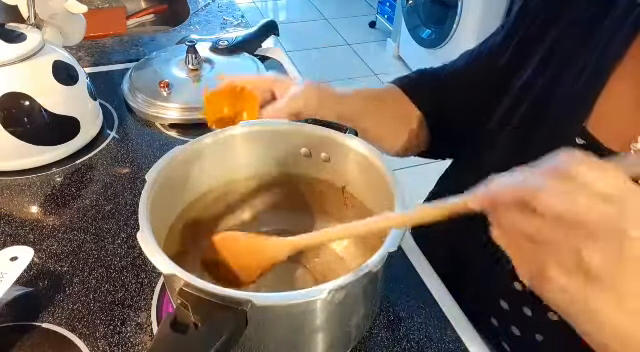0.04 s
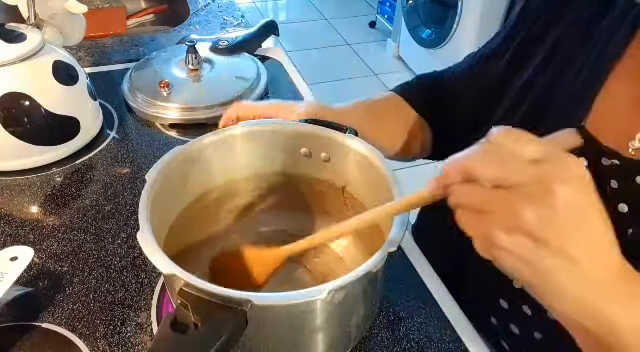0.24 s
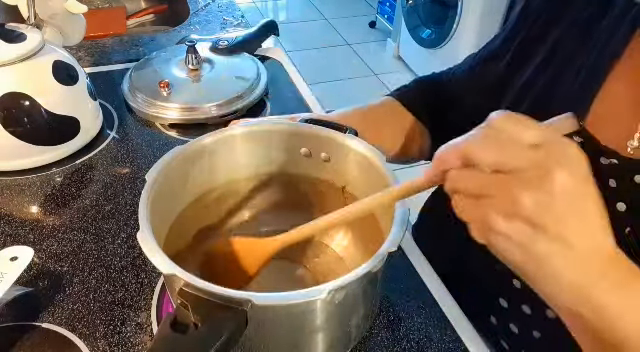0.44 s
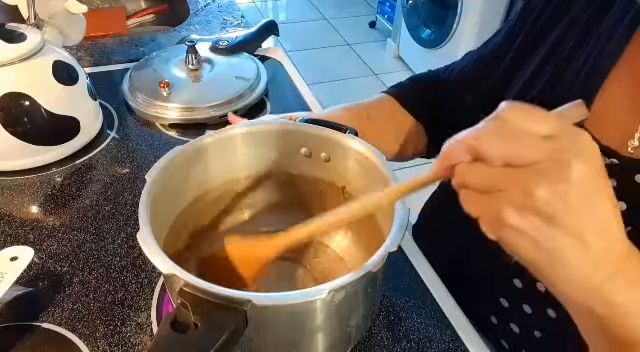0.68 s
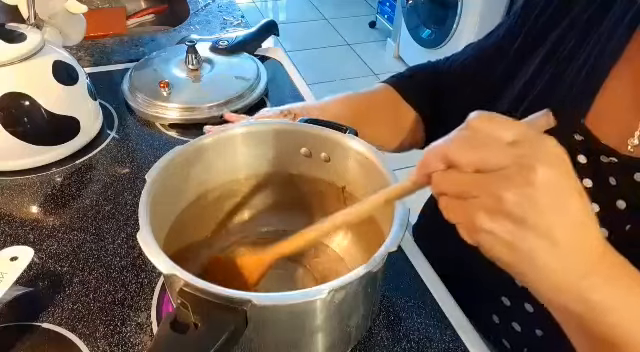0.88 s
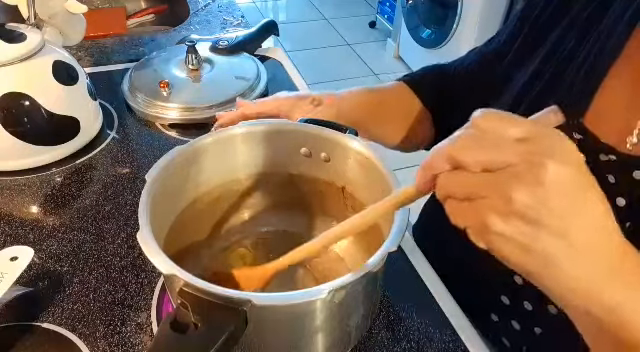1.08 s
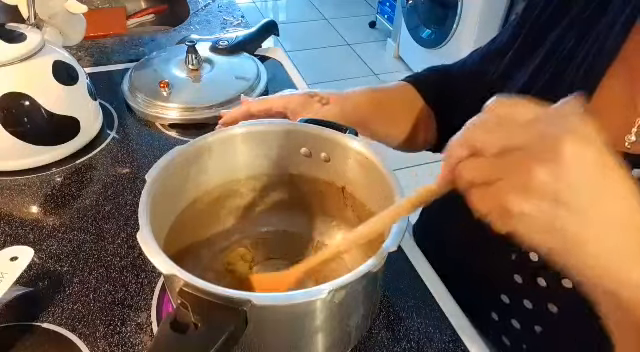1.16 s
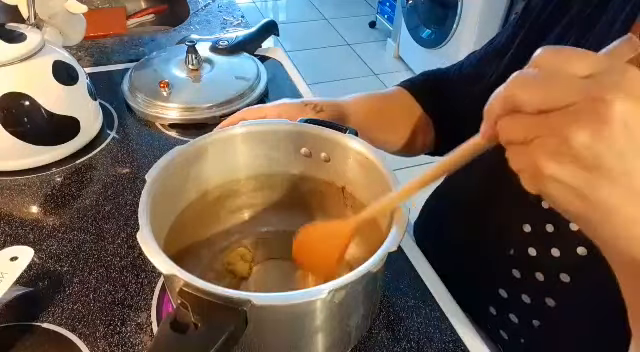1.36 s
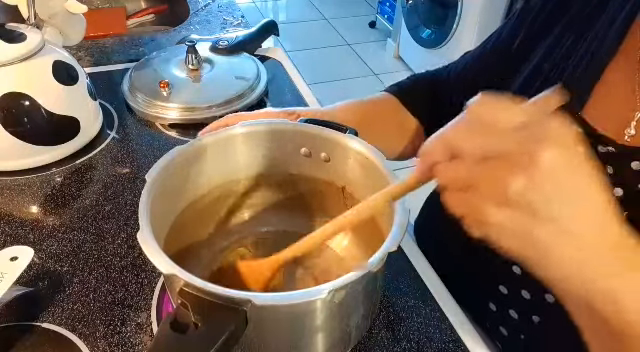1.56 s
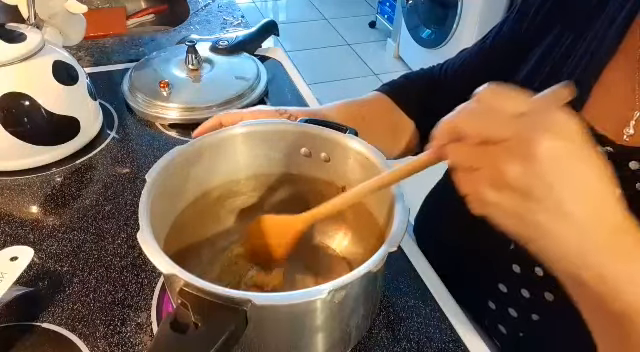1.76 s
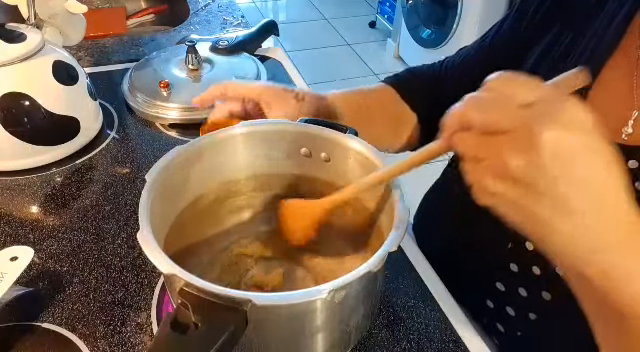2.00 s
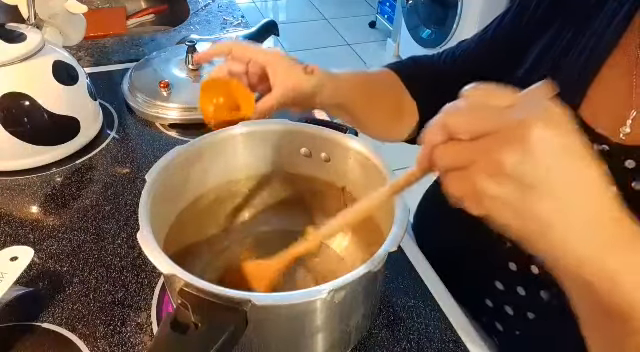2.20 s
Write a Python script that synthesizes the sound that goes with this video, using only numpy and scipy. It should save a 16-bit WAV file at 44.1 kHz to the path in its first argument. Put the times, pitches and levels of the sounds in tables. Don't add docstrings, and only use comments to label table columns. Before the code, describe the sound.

A wooden spoon scrapes and knocks a metal soup pot close to a phone; early on a small jar clacks down on the counter, then rougher strokes and low booms follow over a soft fridge hum.

```python
import sys
import numpy as np
from scipy import signal
from scipy.fft import rfft, irfft, next_fast_len
from scipy.io import wavfile
from scipy.ndimage import map_coordinates

SR = 44100
rng = np.random.default_rng(int(sys.argv[2]) if len(sys.argv) > 2 else 0)


def decibels_to_gain(level_db):
    exponent = np.asarray(level_db, float) / 20
    return 10 ** exponent


def inscribe(sig):
    pcm = np.round(np.clip(np.atleast_2d(sig).T, -1, 1) * 32767)
    wavfile.write(sys.argv[1], SR, pcm.astype(np.int16))


N = 98607

ORDERS_DB = {2: -55, 7: -65, 9: -73, 10: -77, 11: -70, 35: -85, 37: -90, 38: -82, 39: -73, 40: -89}
SHAFT_HZ = 58.66
DRONE_HZ, DRONE_DB, DRONE_WANDER_RAD = 74.2, -49, 1.2
FLUTTER_DB, FLUTTER_PER_S, FLUTTER_RAD = 1.3, 45, 0.3
# [f/Hz, lead/rad]
FRIDGE_TURN = [(100, .6), (600, .6), (2300, 1.4)]
# [f/Hz, level/dB per Hz]
RUMBLE = [(12, -109), (20, -40.5), (54, 4.5), (112, 3), (211, -9.5), (412, -10), (461, -18), (644, -32.5),
          (900, -37.5), (1170, -82), (1980, -120)]
# [f/Hz, level/dB per Hz]
HISS = [(600, 6.5), (900, -13), (1600, -9), (2250, -10), (2900, -15.5), (7000, -22), (12500, -17),
        (16000, -29)]
RUMBLE_DB, HISS_DB = -52.5, -74.5

# [f/Hz, level/dB, t60/s]
BOTTOM = [(148.6, -1, 0.12), (170.9, -2, 0.12), (254, -8.5, 0.083)]
BELLY = [(384, 0.5, 0.12), (485.3, 3.5, 0.089), (521, -16.5, 0.29), (710, -39, 0.024)]
WALL = [(1128, 0, .08), (1165, -8, .035), (845, -14, .07), (1740, -13, .05)]
RIM = [(1065, 0, .06), (1010, -5, .2), (2022, -12, .22), (1770, -4, .04), (715, -9, .1), (3700, -14, .025)]
# [t/s, rasp level/dB, grip on the pot over the rasp/dB]
STROKES = [
    [(0.326, -81, -15), (0.337, -64, 0), (0.345, -58, 6), (0.373, -56, 7.5), (0.463, -81, -16),
     (0.49, -84, -15)],
    [(0.87, -86, 20), (0.89, -66.5, -4), (0.912, -56.5, 19), (0.978, -51.5, 6), (1.024, -71, -3),
     (1.06, -85, -2)],
    [(1.1, -82, -11), (1.232, -82, -14.5), (1.296, -71.5, -3), (1.304, -58, -34), (1.348, -51.5, -2),
     (1.37, -65.5, 6), (1.392, -53.5, 5.5), (1.52, -78, 4)],
    [(1.699, -65, 11), (1.708, -55.5, 0), (1.738, -60.5, 11), (1.808, -43, 5.5), (1.844, -47, 7.5),
     (1.854, -50, 5), (1.882, -90, 2)],
    [(1.884, -59.5, 17.5), (1.892, -43, 3), (1.92, -78, -5), (1.956, -86, 2), (2.024, -59, 2),
     (2.038, -59.5, 13.5)],
    [(2.041, -69, -8), (2.047, -51, 12.5), (2.059, -61, 22), (2.081, -66.5, 21), (2.091, -48, -15),
     (2.103, -56.5, 11), (2.207, -61, -1.5), (2.236, -71, 14)],
]
# [f/Hz, level/dB per Hz]
RASP = [(500, -49), (1500, -15.5), (3000, -17), (4400, -13.5), (8000, -16.5), (12000, -18.5),
        (14500, -20.5), (15800, -35)]
# [f/Hz, level/dB per Hz]
GRIT = [(300, -20), (600, 5.5), (1200, 2.5), (2300, 1), (4500, -13), (8000, -27)]
GRIP_DB = [0.5, -11.5, -15, -8]
GRAINS_PER_S, GRIT_PER_S, GRAIN_SWAY_DB = 16000, 4000, 1.42

# [t/s, bottom level/dB, belly level/dB, wall level/dB, slap level/dB]
KNOCKS = [(0.343, -28.5, -43, -49.5, -53), (0.393, -37.5, -55, -77, -52),
          (0.9132, -24.5, -28.5, -29, -24.5), (0.963, -53, -42, -69, -67), (1.398, -42, -57, -60, -38),
          (1.404, -32.5, -48.5, -31, -59), (1.421, -45, -61, -38.5, -64), (1.441, -36, -63, -51, -68),
          (1.702, -27, -35.5, -62, -50), (1.734, -67, -50, -65, -69), (1.804, -59, -70, -39.5, -65),
          (1.8861, -70, -63, -53, -38), (2.0435, -31.5, -37.5, -77, -31), (2.063, -69, -37, -73, -46),
          (2.072, -47, -36.5, -69, -42), (2.089, -45, -55, -72, -40), (2.0932, -32.5, -53, -60, -54)]
# [t/s, level/dB]
RIM_TAPS = [
    (2.0435, -30.5),
]
# [t/s, level/dB, f/Hz, t60/s]
BOOMS = [
    (.96, -37, 172, .14),
    (1.733, -38, 175, .15),
    (2.0648, -31, 135, .04),
    (2.0735, -32, 177, .3),
    (2.0848, -42, 177, .12),
    (2.0957, -22, 168, .07),
    (2.1318, -36, 160, .12),
]
# [f/Hz, level/dB per Hz]
SLAP = [(150, -14), (500, 0), (1200, -1.5), (2400, -12), (3500, -35), (7000, -32), (15000, -39)]
SWELL_S, BOOM_SWELL_S, SLAP_T60_S = 0.0025, 0.001, 0.03
LEFT_LEADS_S, RIM_LEADS_S = 0.00013, 0.0001
TURN_RAD, SCATTER_DB = 0.3, 1.5

# [t/s, level/dB, f/Hz, t60/s]
PUSHES = [
    (0.606, -24, 125, 0.047),
    (.795, -39, 890, 0.048),
]
# [t/s, level/dB]
JAR_DROPS = [
    (.6166, -9),
    (.6215, -27),
    (.6268, -16),
    (.632, -24),
    (.637, -25),
    (.665, -28),
    (.805, -46),
]
# [f/Hz, level/dB, t60/s]
JAR_SNAP = [(2220, 4, .013), (2390, 1, .011), (1760, -14, .05), (2040, -15, .09), (330, -13, .035),
            (695, -17, .06)]
# [f/Hz, level/dB per Hz]
CLACK = [(120, -32), (300, -1.5), (560, 3.5), (1100, -2), (2200, 5.5), (4600, -6.5), (5600, -20),
         (15000, -39)]
# [f/Hz, level/dB per Hz]
TICK = [(2000, -56), (5000, -2), (9000, -9), (15000, -11)]
CLACK_DB, CLACK_T60_S = -8.5, 0.014
TICK_DB, TICK_T60_S, TICK_GROWS = -21, 0.03, 1.6
JAR_LEADS_S, JAR_SWELL_S = -0.00005, 0.0012

# [f/Hz, t60/s]
KITCHEN = [(150, 0.73), (1000, 0.47), (3000, 0.42), (6000, 0.38), (14000, 0.51)]
POT_WET_DB, RASP_WET_DB, JAR_WET_DB, SNAP_WET_DB = -11, -13, -1.5, -11
# [f/Hz, likeness 0..1]
ALIKE = [(60, 1), (300, 0.81), (600, 0.2), (1400, 0.036), (4000, 0.05)]
# [f/Hz, level/dB]
LEAN = [(40, 7), (150, 7), (400, 2.5), (2000, 3), (12000, 3)]
LOW_HZ, TOP_HZ, EDGE_HZ = 45, 15700, 50


def unit(x):
    return x / np.sqrt(np.mean(x ** 2) + 1e-20)


def along(points, hz):
    f, v = np.transpose(points)
    return np.interp(np.log(hz + 1), np.log(f + 1), v)


def wobble(rate):
    return map_coordinates(rng.standard_normal(200), [np.arange(N) * rate / SR])


def filtered(x, response):
    m = next_fast_len(N + SR // 2)
    return irfft(rfft(x, m) * response(np.fft.rfftfreq(m, 1 / SR)), m)[..., :N]


def spread(pair):
    def mid_side(hz):
        turn = np.arccos(np.clip(along(ALIKE, hz), 0, 1)) / 2
        return np.array([np.cos(turn), np.sin(turn)])

    mid, side = filtered(pair, mid_side)
    return np.array([mid + side, mid - side])


def add(into, s, sound):
    into[:, round(s * SR):][:, :sound.shape[1]] += sound


def fridge_tone(hz, db, wander_rad, sway_db, sway_per_s=9.8):
    t = np.arange(N) / SR
    level = decibels_to_gain(db + 3.0 + sway_db * wobble(sway_per_s))
    apart = along(FRIDGE_TURN, hz) * np.array([[-.5], [.5]])
    return level * np.sin(2 * np.pi * hz * t + wander_rad * wobble(5) + apart)


def fridge_bed(colour):
    noise = rng.standard_normal((2, N))
    return spread(unit(filtered(noise, lambda hz: decibels_to_gain(along(colour, hz)))))


def fridge():
    out = fridge_tone(DRONE_HZ, DRONE_DB, DRONE_WANDER_RAD, 0.67)
    for k, db in ORDERS_DB.items():
        sway = (0.1, 1) if k < 20 else (FLUTTER_RAD, FLUTTER_DB, FLUTTER_PER_S)
        out = out + fridge_tone(k * SHAFT_HZ, db, *sway)
    rumble = decibels_to_gain(RUMBLE_DB) * fridge_bed(RUMBLE + [(1500, -95)])
    hiss = decibels_to_gain(HISS_DB) * fridge_bed([(300, -99)] + HISS)
    return out + rumble + hiss


def slips(rate):
    pulses = (rng.random((2, N)) < rate / SR) * rng.standard_normal((2, N))
    return unit(pulses) * decibels_to_gain(GRAIN_SWAY_DB * wobble(65))


def pot_response(hz):
    out = decibels_to_gain(along(GRIT, hz))
    for grip_db, part in zip(GRIP_DB, (BOTTOM, BELLY, WALL, RIM)):
        for centre, db, t60 in part:
            damping = 1j * hz * 2.2 / t60
            out = out + decibels_to_gain(grip_db + db + 17.5) * damping / (centre * centre - hz * hz + damping)
    return out


def scrape():
    t = np.arange(N) / SR
    rasp, grip = np.zeros(N), np.zeros(N)
    for rows in STROKES:
        s, db, grip_db = np.transpose(rows)
        rasp += decibels_to_gain(np.interp(t, s, db, -120, -120))
        grip += decibels_to_gain(np.interp(t, s, db + grip_db, -120, -120))
    treble = np.mean(decibels_to_gain(2 * along(RASP, np.linspace(5000, 15000, 99))))
    top = np.sqrt(treble * 10000 / (SR / 2))
    fine = filtered(rasp * slips(GRAINS_PER_S), lambda hz: decibels_to_gain(along(RASP, hz)) / top)
    coarse = filtered(grip * slips(GRIT_PER_S), pot_response)
    return spread(fine + coarse)


def kitchen(x):
    hz, t, z = signal.stft(rng.standard_normal((2, SR)), SR, nperseg=256)
    decay = decibels_to_gain(-60 * t / along(KITCHEN, hz)[:, None])
    tail = signal.istft(z * decay, SR, nperseg=256)[1]
    tail = spread(np.pad(tail, ((0, 0), (200, N)))[:, :N])
    send = x.mean(0)[None] + x[:1] - x[1:]
    return signal.fftconvolve(send, tail / np.linalg.norm(tail[0]), axes=1)[:, :N]


def ring(modes, t, swell_s, lead_s=LEFT_LEADS_S):
    hz, db, t60 = np.transpose(modes)[..., None, None]
    luck = rng.standard_normal((len(modes), 2))
    lead = 2 * np.pi * hz * lead_s + TURN_RAD * luck[:, :1, None]
    apart = lead * np.array([[.5], [-.5]])
    level = decibels_to_gain(db + SCATTER_DB * luck[:, 1:, None] - 60 * t / t60)
    tones = level * np.sin(2 * np.pi * hz * t + apart)
    return tones.sum(0) * (1 - np.exp(-t / swell_s))


def crack(t, t60, colour):
    n = len(t)
    m = 2 * n
    hz = np.fft.rfftfreq(m, 1 / SR)
    cepstrum = irfft(np.log(decibels_to_gain(along(colour, hz))), m)
    cepstrum = cepstrum * np.r_[1, np.full(n - 1, 2), np.zeros(n)]
    a, b = rng.standard_normal((2, n)) * decibels_to_gain(-60 * t / t60)
    share = np.clip(along(ALIKE, hz), 0, 1)
    mid = rfft(a, m) * np.sqrt(1 + share)
    side = rfft(b, m) * np.sqrt(1 - share)
    pair = mid + side * np.array([[1], [-1]])
    return 2 * irfft(pair * np.exp(rfft(cepstrum)), m)[:, :n]


def knocks():
    out, t = np.zeros((2, N + SR)), np.arange(SR // 3) / SR
    for s, *dbs, slap_db in KNOCKS:
        for db, part in zip(dbs, (BOTTOM, BELLY, WALL)):
            add(out, s, decibels_to_gain(db) * ring(part, t, SWELL_S))
        add(out, s, decibels_to_gain(slap_db + 4.5) * crack(t, SLAP_T60_S, SLAP))
    for s, db in RIM_TAPS:
        add(out, s, decibels_to_gain(db) * ring(RIM, t, SWELL_S, RIM_LEADS_S))
    for s, db, hz, t60 in BOOMS:
        add(out, s, decibels_to_gain(db) * ring([(hz, 0, t60)], t, BOOM_SWELL_S))
    return out[:, :N]


def jar():
    snap, clack = np.zeros((2, 2, N + SR))
    t = np.arange(SR // 3) / SR
    for s, db, hz, t60 in PUSHES:
        add(snap, s, decibels_to_gain(db) * ring([(hz, 0, t60)], t, 0.0029))
    hardest_db = JAR_DROPS[0][1]
    for s, db in JAR_DROPS:
        tick_db = TICK_DB + (TICK_GROWS - 1) * (db - hardest_db)
        tick = decibels_to_gain(tick_db) * crack(t, TICK_T60_S, TICK)
        add(snap, s, decibels_to_gain(db) * (ring(JAR_SNAP, t, JAR_SWELL_S, JAR_LEADS_S) + tick))
        add(clack, s, decibels_to_gain(db + CLACK_DB) * crack(t, CLACK_T60_S, CLACK))
    snap, clack = snap[:, :N], clack[:, :N]
    return snap + clack + kitchen(decibels_to_gain(SNAP_WET_DB) * snap + decibels_to_gain(JAR_WET_DB) * clack)


def scene():
    hum, rasp, hits = fridge(), scrape(), knocks()
    pot_room = decibels_to_gain(RASP_WET_DB) * kitchen(rasp) + decibels_to_gain(POT_WET_DB) * kitchen(hits)
    return hum + rasp + hits + pot_room + jar()


def roll_off(x):
    return signal.sosfilt(signal.butter(12, 16500, fs=SR, output="sos"), x)


def record(dry):
    def port(hz):
        lean = decibels_to_gain(along(LEAN, hz) * np.array([[.5], [-.5]]))
        low_pass = 1 / (1 + np.exp(np.clip((hz - TOP_HZ) / EDGE_HZ, -50, 50)))
        high_pass = (1j * hz / (LOW_HZ + 1j * hz)) ** 2
        return lean * low_pass * high_pass

    return roll_off(filtered(dry, port))


dry = scene()
out = record(dry)
inscribe(out)
```